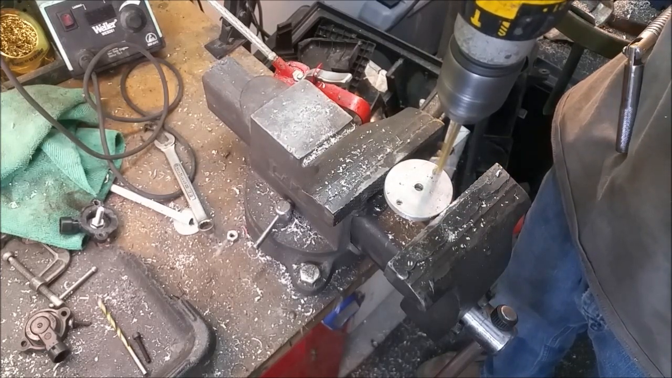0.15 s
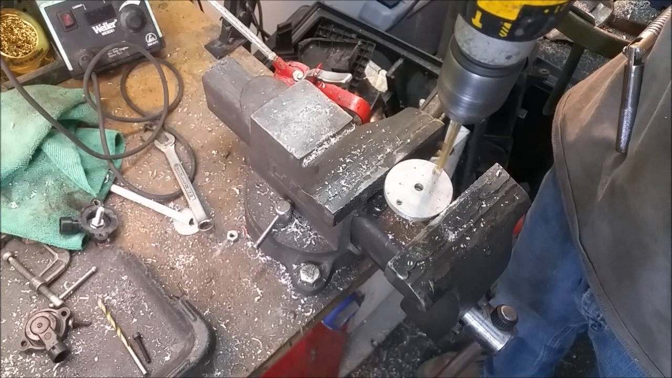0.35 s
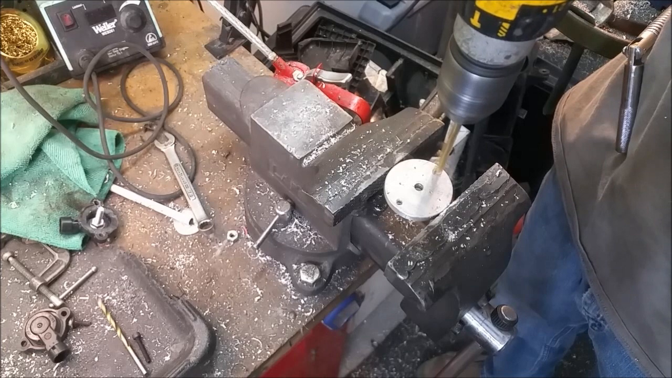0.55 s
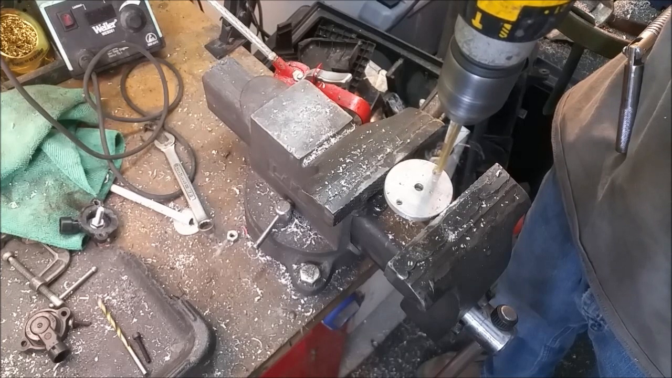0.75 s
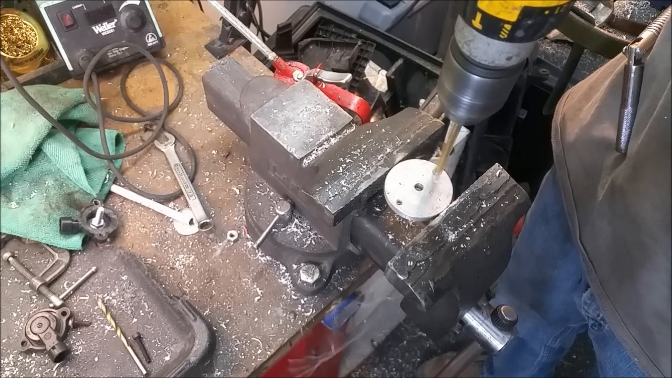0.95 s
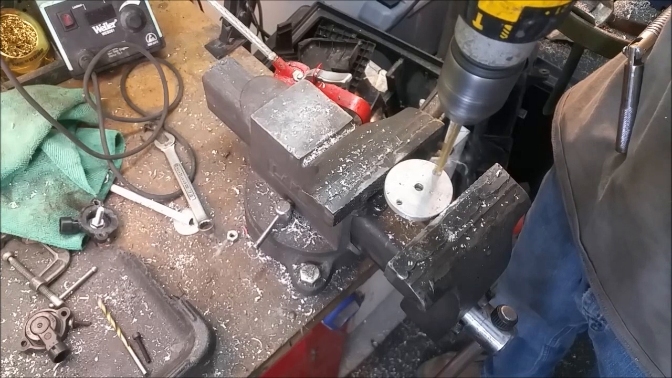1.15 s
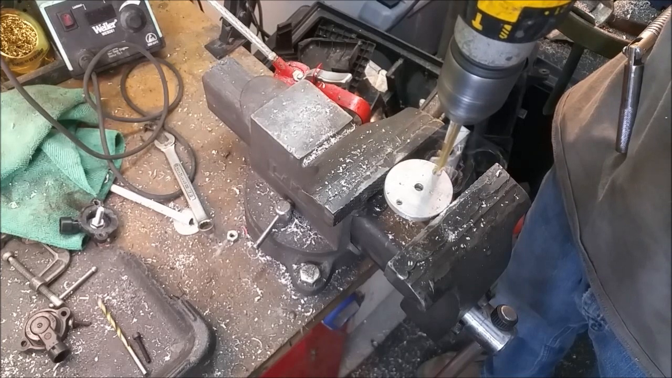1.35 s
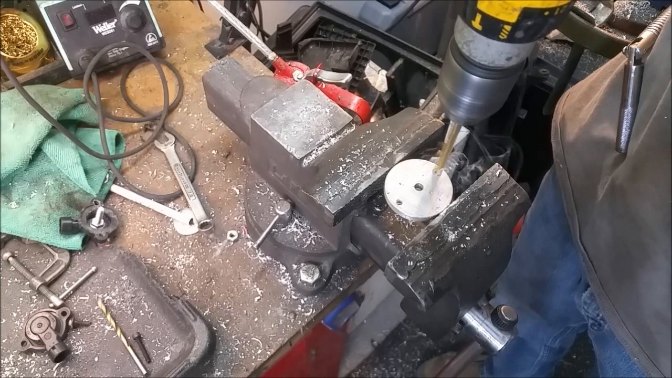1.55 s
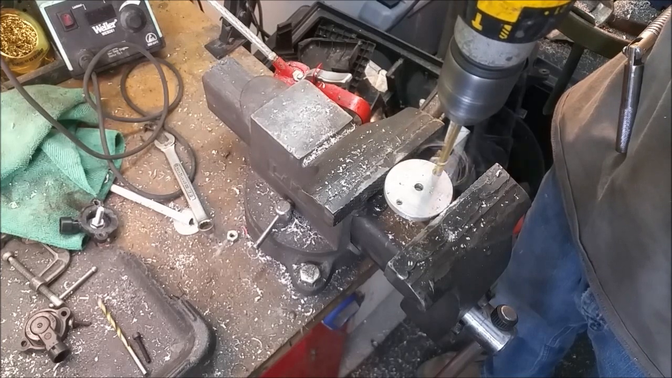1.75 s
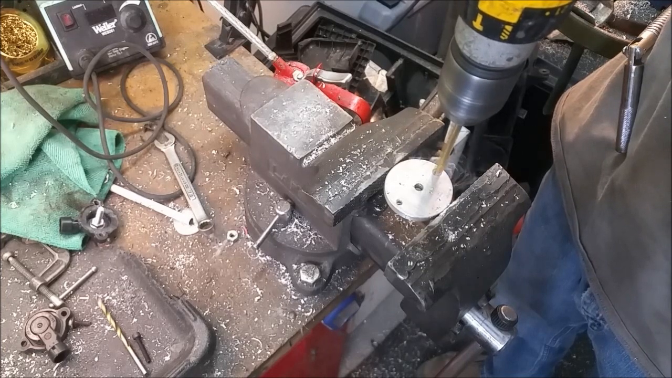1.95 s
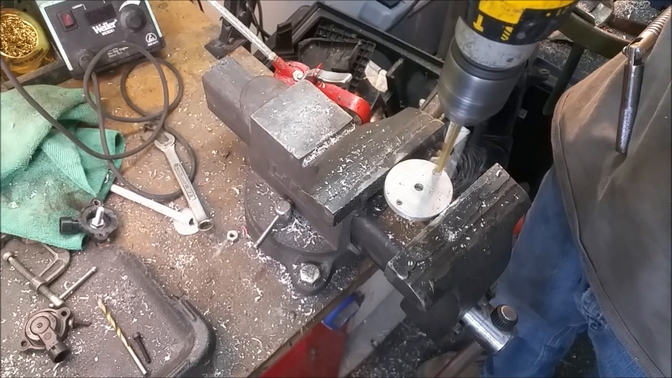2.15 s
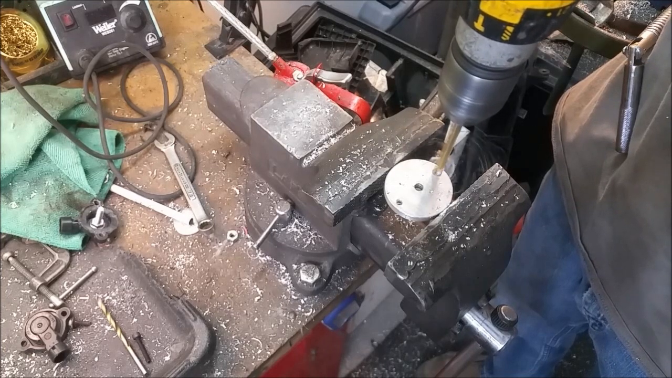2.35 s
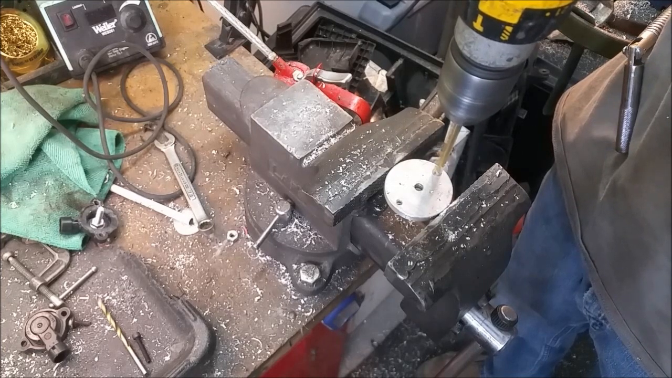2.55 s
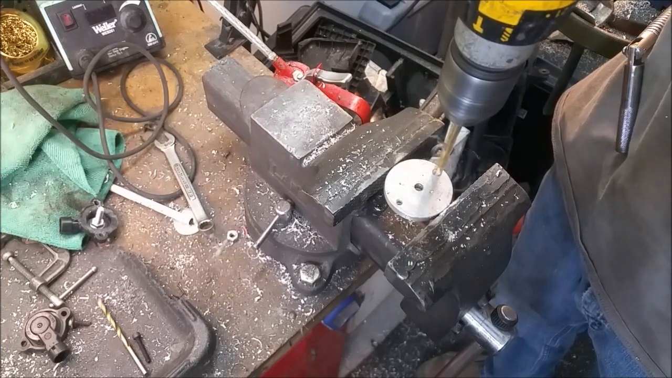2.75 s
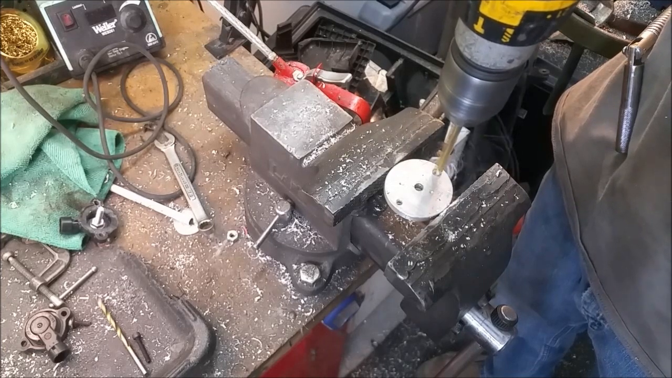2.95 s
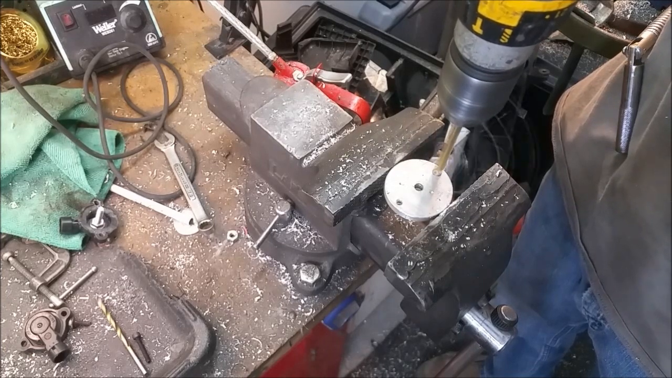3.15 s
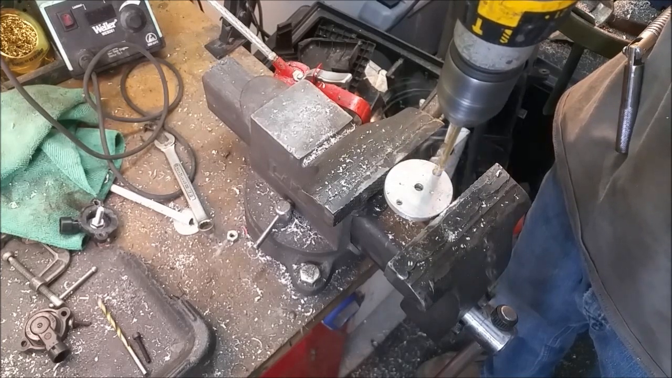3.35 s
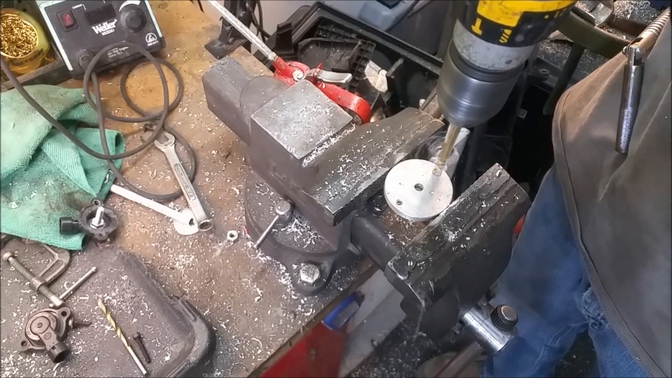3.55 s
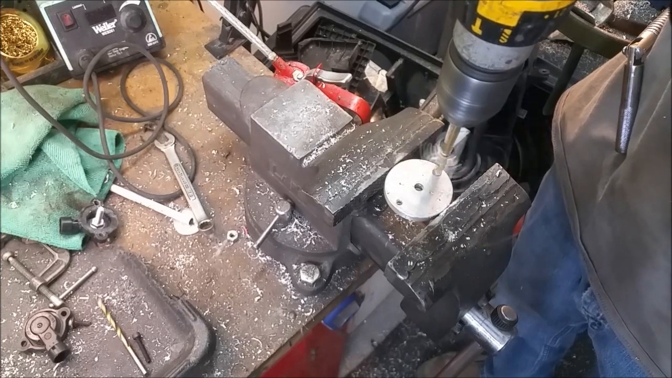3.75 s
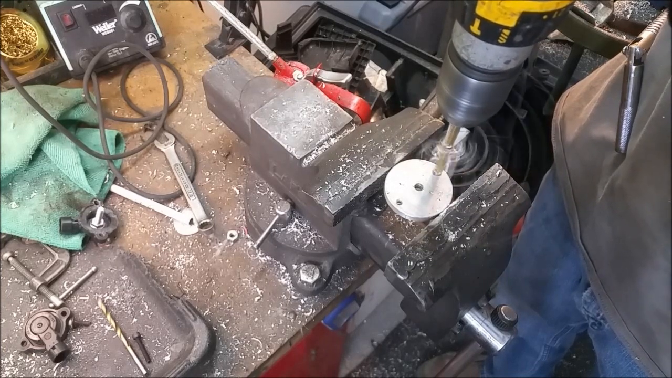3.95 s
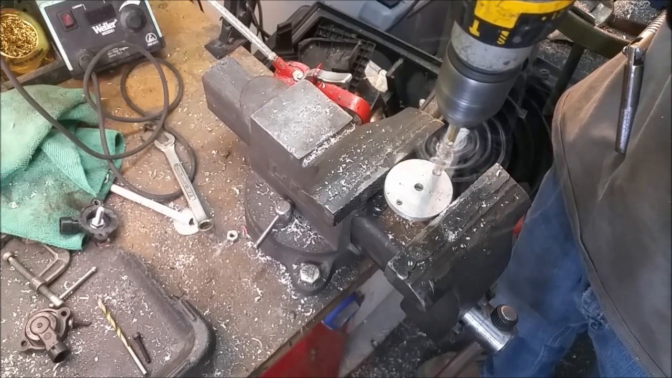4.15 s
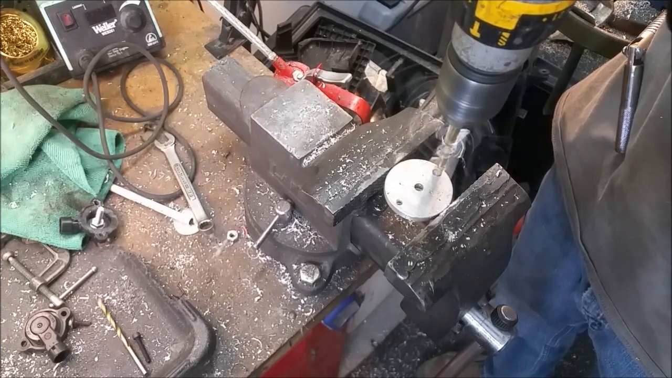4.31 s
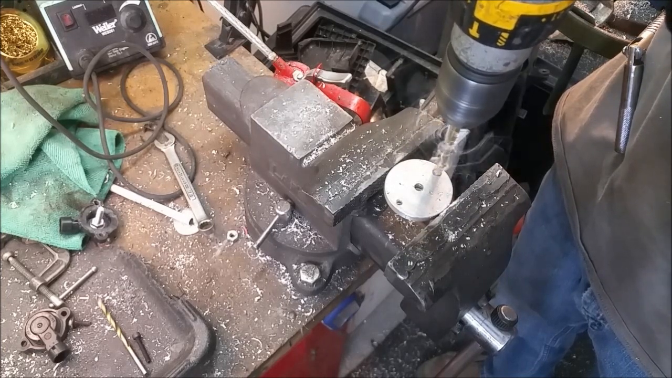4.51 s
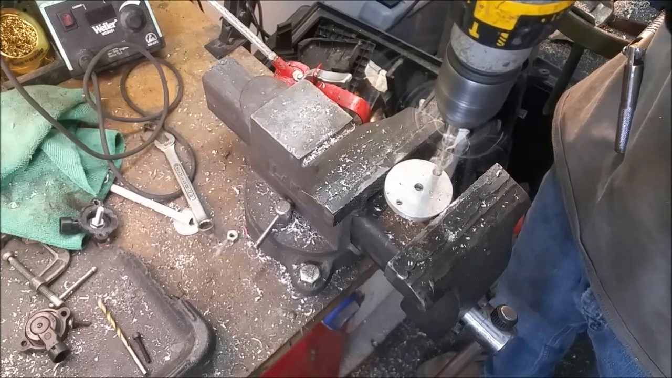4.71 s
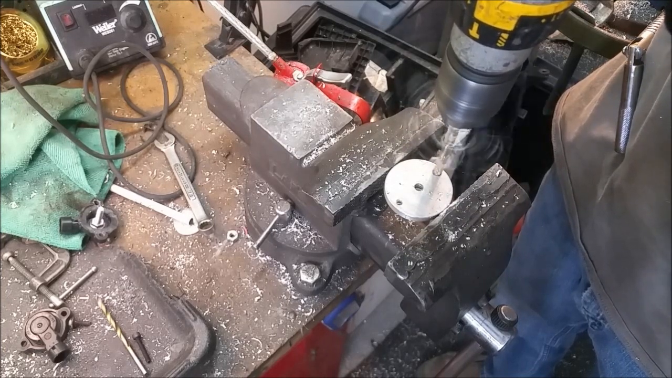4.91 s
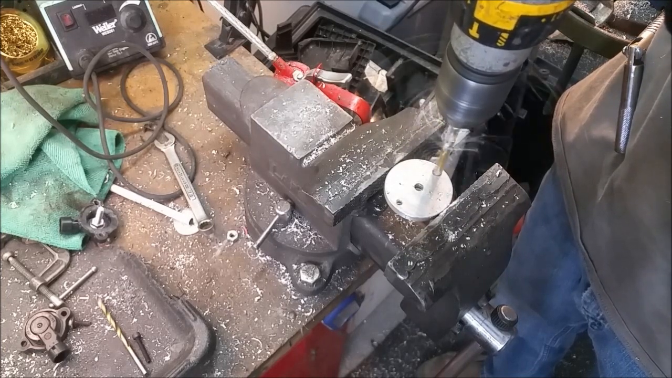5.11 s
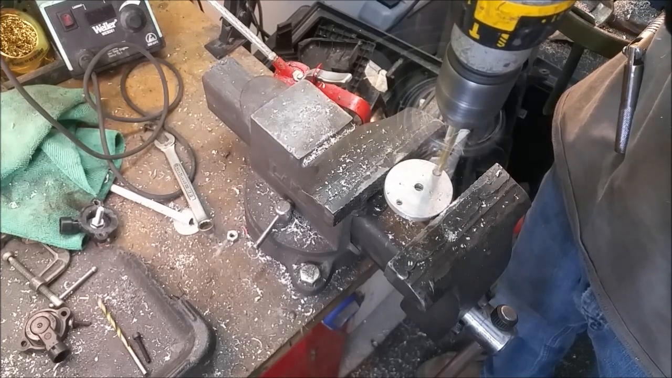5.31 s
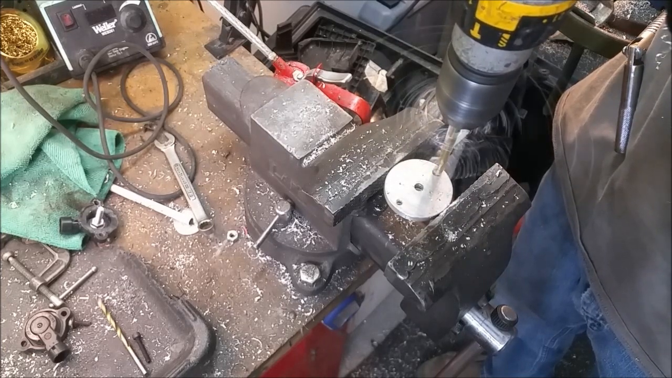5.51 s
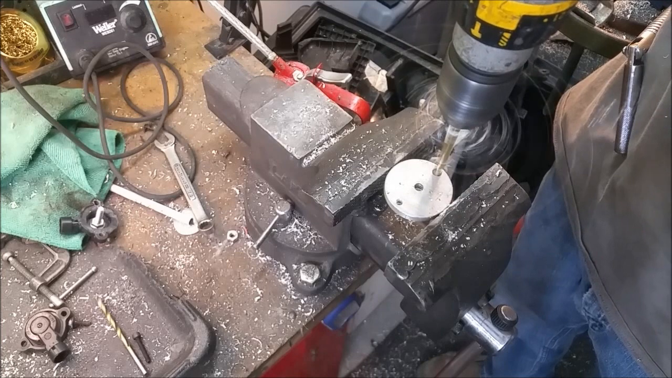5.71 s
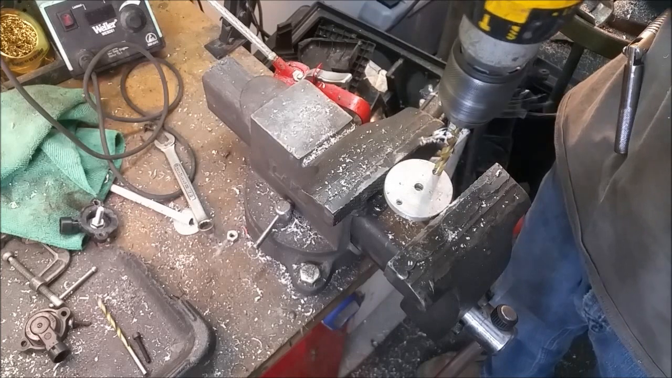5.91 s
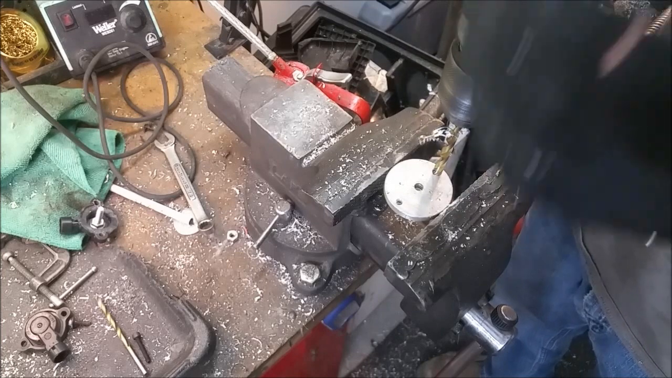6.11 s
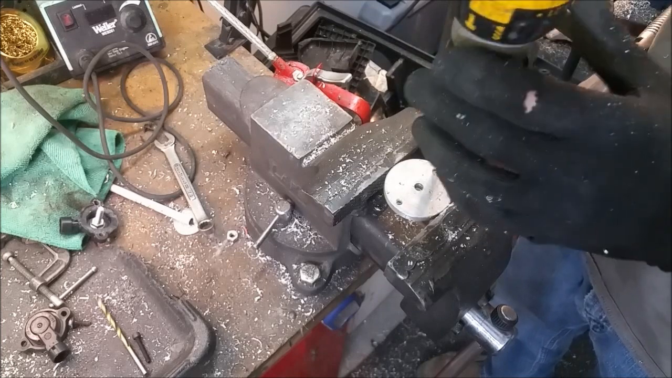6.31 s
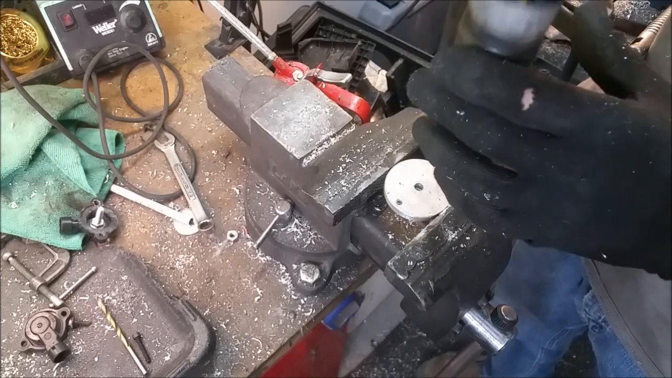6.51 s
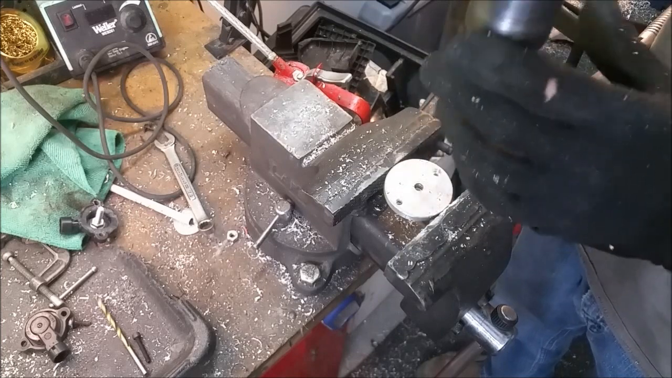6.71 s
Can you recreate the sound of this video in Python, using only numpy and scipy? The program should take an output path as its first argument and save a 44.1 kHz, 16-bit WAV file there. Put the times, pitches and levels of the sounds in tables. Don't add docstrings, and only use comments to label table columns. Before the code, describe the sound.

A power drill cuts metal with a piercing, wavering high squeal over motor whir and hiss, stops dead, then blips once with a clack.

```python
import sys
import numpy as np
from scipy import signal
from scipy.fft import rfft, irfft, next_fast_len
from scipy.io import wavfile
from scipy.ndimage import uniform_filter1d

SR = 44100
rng = np.random.default_rng(int(sys.argv[2]) if len(sys.argv) > 2 else 0)


def invert_db(x):
    u = np.asarray(x, float) / 20
    return 10 ** u


def output_pcm(signal):
    pcm = np.clip(np.atleast_2d(signal).T, -1, 1) * 32767
    wavfile.write(sys.argv[1], SR, np.round(pcm).astype(np.int16))


N = 298557

# (t/s, turns made so far)
CHUCK_TURNS = [(0, .04), (.3, 5.01), (1.05, 17.12), (1.8, 28.96), (2.25, 36.15), (2.7, 43.17), (3.3, 52.51),
               (3.9, 61.77), (5.7, 89.82), (6.2, 97.9)]
# (t/s, stage: 0 shallow, 1 half-deep, 2 deep)
HOLE_DEPTH = [
    (1.95, 0),
    (2.35, 1),
    (3.4, 1),
    (3.9, 2),
]
# (t/s, squeal wobble f/Hz, squeal level/dB)
CUT = [(0, 88, -22.5), (.75, 96, -22.5), (1.2, 95, -25), (1.7, 80, -24), (2.2, 60, -24), (2.55, 63, -22.5),
       (3.45, 54, -22.5), (3.85, 44, -20.5), (4.6, 30, -21), (4.8, 32, -21), (5.15, 32, -20),
       (5.9, 32, -19.5)]
# (t/s, depth of the throb, gear mesh level/dB)
BITE = [(.85, 1.5, -56), (.97, 2.3, -54.5), (3.0, 1.84, -53), (5.8, 0.82, -54.5)]
PITCH_IN_TURN = [(0, .65, .6, 1.45), (.2, .95, .85, .6), (.25, -.6, -.75, -.9), (.36, -.9, -.95, -.4),
                 (.52, -1.5, -1.25, -.5), (.61, -1.25, -.95, -1.0), (.65, -.05, -.2, -.3),
                 (.75, .2, -.2, -1.1), (.82, .35, .4, .8)]
# (share of turn, width/turns, loss/dB when shallow, half-deep, deep)
GRIP_SLIPS = [(.27, 0.024, 2.5, 4.3, 2.9), (.46, 0.023, 8.5, .3, 0.28), (.62, 0.022, 0.5, 5.1, 2.7),
              (.73, 0.035, 8.5, 9, 8), (.92, 0.084, 1.5, 2, 3.5)]
OCTAVE_DB = [-25, -24.5, -23.5]
SQUEAL_LEAD_RAD = [.15, .9, .45]
SQUEAL_LEFT_DB = [.6, 1.1, 0]
# (f/Hz, t60/s, place/turns,
# throb/dB, level/dB when shallow, half-deep, deep)
RUNG_PARTS = [(2357, 0.0106, 0, 0, -56, -50, -50.5), (4630, 0.0092, 0.29, -4.5, -48, -59.5, -50),
              (3700, .018, .35, 4, -52, -45, -51), (3830, .018, .45, 4, -53, -45, -50),
              (6160, 0.01, 1, 1, -44.5, -51, -51), (7960, 0.013, 0.34, 12.5, -73, -57.5, -68.5),
              (6820, .035, .97, 7, -52, -52, -47), (11970, 0.023, 0, 8.5, -47, -57.5, -58.5),
              (12100, 0.01115, 0.99, 6.5, -52.5, -53, -47.5)]
# (multiple of mesh, level/dB)
ARMATURE_TONES = [(.638, -7), (1.25, -5), (1.873, -1.6), (2.235, -4.5), (2.51, -0.5), (2.64, -3.5)]
# (f/Hz, level at resonance/dB, t60/s)
DISC_MODES = [(5540, -7, 0.15), (5600, -14, .06), (5688, -14, 0.07)]
# (f/Hz, t60/s, level/dB when shallow, half-deep, deep)
STAND_MODES = [(95.1, .35, -67.5, -63, -72), (143, .25, -70.5, -66, -76), (202.6, .9, -75, -74, -71.5)]
# (f/Hz, level per Hz/dB)
MOTOR_SPECTRUM = [(150, -35), (300, -8.5), (700, -4), (1700, -2.5), (2800, -19), (5200, -6), (7500, -10),
                  (10000, -6.5), (13500, -11.5), (15500, -7)]
# (f/Hz, level per Hz/dB)
CUTTING_SPECTRUM = [(300, -17.5), (700, -13.5), (1500, -4), (2500, 0), (4500, -3), (6000, 11),
                    (7500, -30.5), (10000, -21)]
# (f/Hz, level per Hz/dB)
BENCH_SPECTRUM = [(12, -44), (20, -40), (80, 2), (125, 1.5), (203, -0.5), (340, -9.5), (400, -6.5),
                  (520, -40.5), (880, -120)]
# (f/Hz, level per Hz/dB)
HUSH_SPECTRUM = [(15, -30), (25, -6.5), (509, -25), (2010, -33.5), (2560, -27), (3630, -48), (5730, -29),
                 (7500, -47), (15500, -39.5)]
MOTOR_DB = [-51.5, -51, -50.5]
CUTTING_DB = [-38.5, -34.5, -35]
# (f/Hz, left-right likeness)
LIKENESS = [(100, .8), (300, .5), (600, .35), (1400, .3), (2800, .35), (6000, .4), (9000, .3), (15000, .35)]
# (f/Hz, left minus right/dB)
NOISE_LEFT_DB = [(300, 6.5), (1300, 1.5), (4400, 1), (8000, 0.5), (15000, -1)]
# (f/Hz, t60/s)
SHOP_T60 = [(200, .5), (2000, .4), (6000, .33), (12000, .16)]
# (start t/s, fall/dB per s)
RUN_DOWN = [
    (5.915, 320),
    (5.88, 165),
    (5.85, 110),
    (5.85, 260),
]
# (f/Hz, level/dB, t60/s)
FREED_MODES = [(5520, -4, .3), (5636, -8.5, 0.41), (5706, 0.5, .27), (5792, -4.5, .2), (6080, -16, 0.32),
               (6363, -18, .14), (6600, -20, .25)]
# (start t/s, length/s, from f/Hz, to f/Hz, level/dB)
TRIGGER_WHINES = [(6.277, .024, 4720, 4780, -71), (6.36, .014, 5080, 4950, -69),
                  (6.378, .027, 4000, 3650, -47), (6.406, .03, 3650, 4300, -47)]
# (t/s, peak level/dB)
GEAR_CLACKS = [(6.417, -33), (6.577, -28), (6.582, -32), (6.605, -25), (6.612, -31), (6.678, -46)]
# (f/Hz, level/dB, t60/s)
CASE_MODES = [(700, -7, .03), (950, -3, .03), (1450, -3, .015), (2600, -4, .008), (3600, -6, .006),
              (5200, -8, .004), (8000, -12, .003)]
# (t/s, f/Hz)
BLIP_MESH = [(6.38, 280), (6.44, 500), (6.47, 740), (6.52, 850), (6.55, 850), (6.59, 420), (6.65, 300)]
# (level at full speed/dB, swell/dB per s, fall/dB per s)
BLIP_LAYERS = [
    (-55, 27.5, 432.5),
    (-40, 6, 260),
    (-77, -40, 120),
    (-57, 7, 598),
]

SQUEAL_HZ, SQUEAL_STOP_S, SQUEAL_T60_S = 5612, 5.843, .1
GRIP_DB = 1
BREAKOUT_S = 5.832
EASE_S, EASE_DB = 5.78, 8
BENCH_DB, LEAN_ON_S, LEAN_ON_DB = -59, 4.42, 9.5
THUMP_S, THUMP_DB, THUMP_WIDTH_S = 5.805, 6, .015
HUSH_DB, FREED_DB = -74, -28.5
MESH_PER_TURN, BRAKE_S, BRAKE_HZ_PER_S = 64.1, 5.85, 4800
LIFTED_S, SWITCH_ON_S = 6.2, 6.386
BLIP_ON_S, BLIP_OFF_S, BLIP_BRAKE_S, BLIP_RISE_DB_PER_S = 6.418, 6.605, 6.55, 576.5
UNLOADED_MESH_DB = 4
WHINE_RISE_DB_PER_S, WHINE_FALL_DB_PER_S = 5000, 1500
TOP_HZ = 16350


def rms_one(x):
    return x / np.sqrt(np.mean(x ** 2) + 1e-20)


def in_time(rows, left=None, right=None):
    s, *columns = np.transpose(rows)
    return [np.interp(np.arange(N) / SR, s, c, left, right) for c in columns]


def at_hz(points, hz):
    points = np.array(points)
    return np.interp(np.log(hz), np.log(points[:, 0]), points[:, 1])


def by_stage(values):
    stage, = in_time(HOLE_DEPTH)
    return sum(np.maximum(1 - np.abs(stage - k), 0) * v for k, v in enumerate(values))


def after(s):
    return np.maximum(np.arange(N) / SR - s, 0)


def before(s):
    return np.maximum(s - np.arange(N) / SR, 0)


def drift(rate):
    r = np.exp(-32 * np.pi * rate / SR)
    slow = signal.lfilter([1], [1, -2 * r, r * r], rng.standard_normal(N // 16 + 3002))
    slow = rms_one(slow[3000:])
    return np.interp(np.arange(N) / 16, np.arange(len(slow)), slow)


def ring(clicks, hz, t60):
    r, w = invert_db(-60 / (t60 * SR)), 2 * np.pi * hz / SR
    return signal.lfilter([0, np.sin(w)], [1, -2 * r * np.cos(w), r * r], clicks + 1e-18)


def tone(hz):
    return 2 * np.pi * np.cumsum(hz) / SR


def pan(left_db):
    return invert_db(np.array([[left_db / 2], [-left_db / 2]]))


def run_and_blip(layer, running_db):
    stop, down = RUN_DOWN[layer]
    full_db, swell, fall = BLIP_LAYERS[layer]
    rise_db = BLIP_RISE_DB_PER_S * (before(BLIP_ON_S) + 2 * before(SWITCH_ON_S))
    blip_db = full_db - rise_db + swell * after(BLIP_ON_S) - fall * after(BLIP_OFF_S)
    return np.maximum(running_db - down * after(stop), blip_db)


def squeal(turns, wobble_hz, level_db):
    share, *columns = np.transpose(PITCH_IN_TURN)
    place = turns + .006 * drift(8)
    columns = [np.interp(place, share, c, period=1) for c in columns]
    offset = 1.05 * by_stage(columns) + .15 * drift(40)
    phase = tone(SQUEAL_HZ + wobble_hz * offset + 25 * drift(172))

    slips_db = 0
    for at, width, *loss in GRIP_SLIPS:
        distance = (place - at + .5) % 1 - .5
        slips_db = slips_db + by_stage(loss) * np.exp(-.5 * (distance / width) ** 2)
    throb_db = in_time(BITE)[0] * (GRIP_DB - slips_db * invert_db(1.5 * drift(25)))
    throb_db = throb_db - 1.2 * np.maximum(drift(130) - .4, 0) ** 2 + .5 * drift(30)
    free_db = -60 * after(SQUEAL_STOP_S) / SQUEAL_T60_S

    grit = 1 + .14 * drift(350)
    lead = by_stage(SQUEAL_LEAD_RAD) * [[-.5], [.5]]
    main = grit * invert_db(level_db + throb_db + free_db + 4.0) * np.sin(phase + lead)
    octave_db = level_db + by_stage(OCTAVE_DB) + 1.7 * throb_db + 2 * free_db + 1.9 * drift(86)
    wander = 0.76 * np.array([drift(45), drift(20)])
    octave = invert_db(octave_db + 2.0) * np.sin(2 * phase + np.array([[0], [2.6]]) + wander)
    direct = main * invert_db(by_stage(SQUEAL_LEFT_DB) * [[.5], [-.5]]) + octave * pan(17.6)
    to_walls = main[0] + .3 * octave[0]
    return direct, to_walls


def disc(drive):
    out = 0
    for hz, db, t60 in DISC_MODES:
        unit_peak = 2 * np.log(1000) / (t60 * SR)
        out = out + invert_db(db) * unit_peak * ring(drive, hz, t60)
    return out


def chips(turns):
    out, cutting = np.zeros((2, N)), np.arange(N) < SQUEAL_STOP_S * SR
    ease_db = EASE_DB / 2 * (after(EASE_S) > 0)
    for hz, t60, place, throb_db, *stage_db in RUNG_PARTS:
        snaps = rng.random(N) < 550 / SR
        heights = invert_db(3.5 * np.minimum(rng.exponential(size=N), 3.2))
        snaps = snaps * heights * rng.choice([-1, 1], N)
        snaps[round(BREAKOUT_S * SR)] = invert_db(18 if hz > 6000 else 10)
        swell_db = throb_db * np.cos(2 * np.pi * (turns - place)) + 3.25 * drift(37.0)
        rung = rms_one(ring(snaps * invert_db(swell_db - ease_db) * cutting, hz, t60))
        rung = invert_db(by_stage(stage_db)) * rung
        out += [np.roll(rung, 1), rung]
    return out


def gears(turns):
    speed = uniform_filter1d(np.gradient(turns) * SR, size=SR // 3, mode="nearest")
    running = MESH_PER_TURN * np.minimum(speed, 16.4) - BRAKE_HZ_PER_S * after(BRAKE_S)
    mesh_hz = np.where(after(LIFTED_S) > 0, in_time(BLIP_MESH)[0], np.maximum(running, 300))
    phase = tone(mesh_hz)
    level_db = run_and_blip(layer=3, running_db=in_time(BITE)[1])
    unloaded = after(SWITCH_ON_S) * before(BLIP_BRAKE_S) > 0
    mesh_db = level_db + UNLOADED_MESH_DB * unloaded + 1 + 0.7 * drift(9.9)
    out = invert_db(mesh_db) * np.sin(phase + 0.22 * drift(7.4))
    for k, db in ARMATURE_TONES:
        out = out + invert_db(level_db + db + 3 + 2.5 * drift(45)) * np.sin(k * phase + 1.0 * drift(22))
    return out


def stand(push_db):
    shake = rng.standard_normal(N) * (before(SQUEAL_STOP_S) > 0)
    hum = 0
    for hz, t60, *db in STAND_MODES:
        hum = hum + invert_db(by_stage(db) + push_db) * rms_one(ring(shake, hz, t60))
    return hum * pan(12.66)


def rush(turns, motor_db, cutting_db, bench_db):
    edges = 22 * 2 ** np.arange(0, 9.7, .4)
    centres = np.sqrt(edges[1:] * edges[:-1])
    out, white, together = 0, rng.standard_normal((2, 2, N)), drift(42)
    tearing_db = cutting_db + 0.5 + 1.27 * np.cos(2 * np.pi * (turns - .05))
    sources = [(MOTOR_SPECTRUM, motor_db + 8.5), (CUTTING_SPECTRUM, tearing_db), (HUSH_SPECTRUM, HUSH_DB)]
    totals = []
    for spectrum, db in sources + [(BENCH_SPECTRUM, 0)]:
        totals.append(10 * np.log10(np.sum(invert_db(2 * at_hz(spectrum, centres)) * np.diff(edges))))
    for k, hz in enumerate(centres):
        sos = signal.butter(2, edges[k:k + 2], "band", fs=SR, output="sos")
        mid, side = signal.sosfilt(sos, white[k % 2]) * np.sqrt(SR / 2)
        power = sum(invert_db(2 * (at_hz(s, hz) + db - total)) for (s, db), total in zip(sources, totals))
        air = np.sqrt(power) * invert_db(1.0 * together + 0.7 * drift(60))
        alike = np.clip(at_hz(LIKENESS, hz), -1, 1)
        stereo = np.sqrt(1 + alike) * mid + np.sqrt(1 - alike) * side * [[1], [-1]]
        out = out + air * stereo * pan(at_hz(NOISE_LEFT_DB, hz)) * 0.64
        sway_db = 2 * np.cos(2 * np.pi * (turns - .5)) + 1.3 * drift(15)
        shake = invert_db(at_hz(BENCH_SPECTRUM, hz) + bench_db - totals[-1] + sway_db)
        out = out + shake * np.array([invert_db(3.5) * side, invert_db(-31.0) * (side + mid)])
    return out


def shop(x):
    size = next_fast_len(N + SR)
    hz = np.maximum(np.fft.rfftfreq(size, 1 / SR), 1)
    fields, t60 = np.zeros((2, len(hz)), complex), at_hz(SHOP_T60, hz)
    for k, lag in enumerate(rng.uniform(.009, .04, size=20)):
        loop = invert_db(-60 * lag / t60) * np.exp(-2j * np.pi * hz * lag)
        fields[k % 2] += loop / (1 - loop) * (-1) ** (k // 2)
    mid, side = irfft(fields * rfft(x, size), size)[:, :N]
    return mid + invert_db(-3.0) * side * [[1], [-1]]


def freed():
    feeding = (after(SQUEAL_STOP_S - .02) > 0) * (before(SQUEAL_STOP_S + .01) > 0)
    feed = rng.standard_normal((2, N)) * feeding
    feed = feed[0] + .4 * feed
    top = max(db for hz, db, t60 in FREED_MODES)
    out = 0
    for hz, db, t60 in FREED_MODES:
        out = out + invert_db(FREED_DB + db - top - 30.5) * ring(feed, hz, np.clip(t60, .1, .45))
    return out


def trigger(motor_db):
    glide, levels = [], []
    for s, length, start_hz, end_hz, db in TRIGGER_WHINES:
        glide += [(s, start_hz), (s + length, end_hz)]
        levels.append(db - WHINE_RISE_DB_PER_S * before(s) - WHINE_FALL_DB_PER_S * after(s + length))
    hz, = in_time(glide)
    phase = tone(hz + 110 * drift(160))
    whine_db = np.max(levels, axis=0) + 1.0 + 4.2 * drift(84)
    whine = invert_db(whine_db) * (np.sin(phase) + invert_db(-20) * np.sin(2 * phase))

    at = [round(s * SR) for s, db in GEAR_CLACKS]
    knocks = np.zeros(N)
    for hz, mode_db, t60 in CASE_MODES:
        clicks = np.zeros(N)
        clicks[at] = invert_db(np.array(GEAR_CLACKS)[:, 1] + mode_db - 0.5 + rng.normal(0, 2.9, len(at)))
        contact = rng.standard_normal(60) * np.exp(-np.arange(60) / 25) * .4
        knocks += ring(np.convolve(clicks, contact)[:N], hz, t60)
    loose = (rng.random(N) < 900 / SR) * rng.standard_normal(N)
    loose = loose * invert_db(motor_db) * (after(LIFTED_S) > 0)
    for db, hz, t60 in [(2, 1687, .012), (-8, 4300, .014), (-3, 5760, .012)]:
        knocks += invert_db(db) * ring(loose, hz, t60)
    return whine + signal.sosfilt(signal.butter(2, 600, "high", fs=SR, output="sos"), knocks)


def scene():
    turns, = in_time(CHUCK_TURNS)
    wobble_hz, squeal_db = in_time(CUT)
    motor_db = run_and_blip(layer=0, running_db=by_stage(MOTOR_DB) + 1.3 * drift(4))
    ease_db = EASE_DB * np.minimum(after(EASE_S) / .02, 1)
    cutting_db = run_and_blip(layer=1, running_db=by_stage(CUTTING_DB) + 0.3 * drift(3.3) - ease_db)
    push_db = LEAN_ON_DB * np.minimum(after(LEAN_ON_S) / 0.014, 1)
    from_thump_s = after(THUMP_S) + before(THUMP_S)
    thump_db = THUMP_DB * np.exp(-.5 * (from_thump_s / THUMP_WIDTH_S) ** 2)
    bench_db = run_and_blip(layer=2, running_db=BENCH_DB + push_db + thump_db)

    direct, to_walls = squeal(turns, wobble_hz, squeal_db)
    metal = chips(turns) + gears(turns) * pan(2.4) + trigger(motor_db) * pan(-4)
    noise = rush(turns, motor_db, cutting_db, bench_db)
    walls = shop(to_walls + metal[0])
    return direct + metal + noise + freed() + disc(direct) + stand(push_db) + invert_db(-23.5) * walls


def band_limit(x):
    return signal.sosfilt(signal.butter(12, 16060, fs=SR, output="sos"), x)


def record(dry):
    mix = signal.sosfilt(signal.cheby2(12, 70, TOP_HZ, fs=SR, output="sos"), dry)
    return band_limit(mix)


dry = scene()
out = record(dry)
output_pcm(out)
```